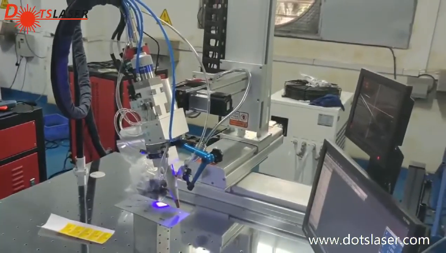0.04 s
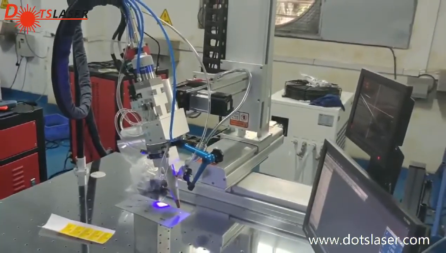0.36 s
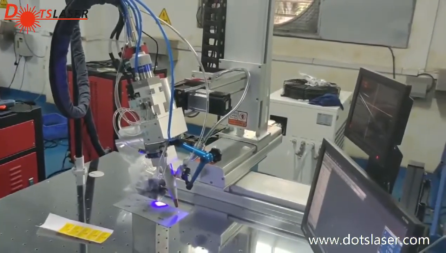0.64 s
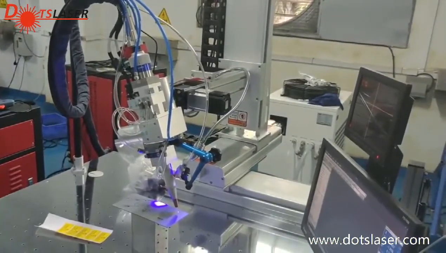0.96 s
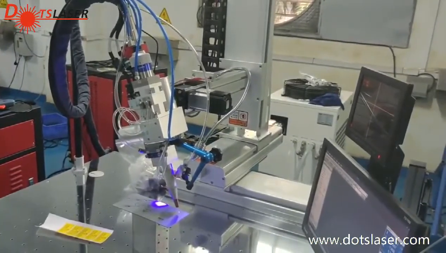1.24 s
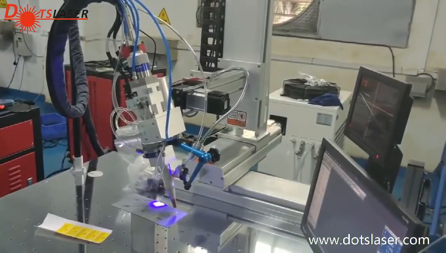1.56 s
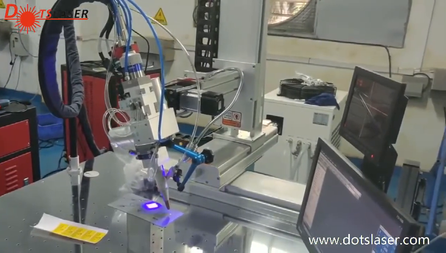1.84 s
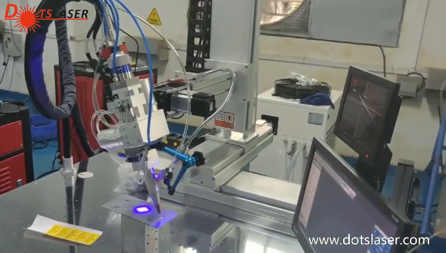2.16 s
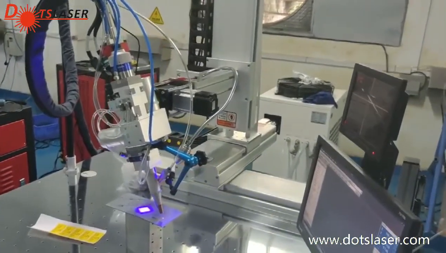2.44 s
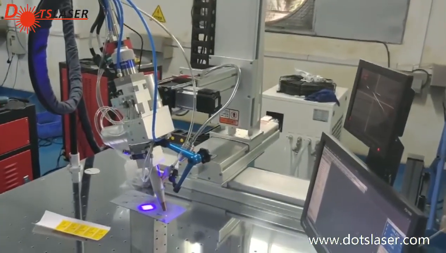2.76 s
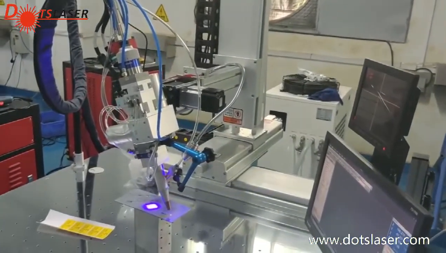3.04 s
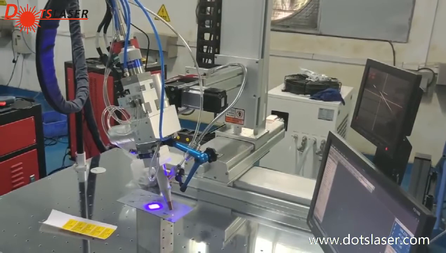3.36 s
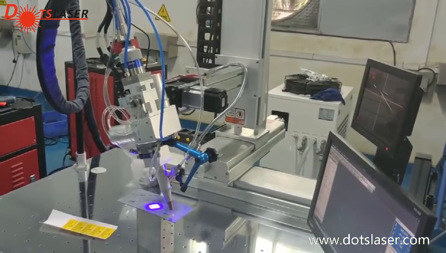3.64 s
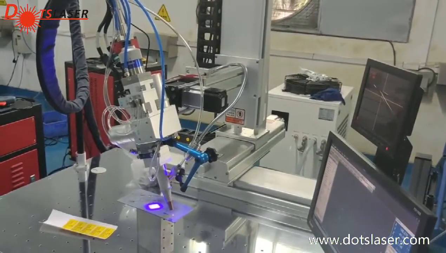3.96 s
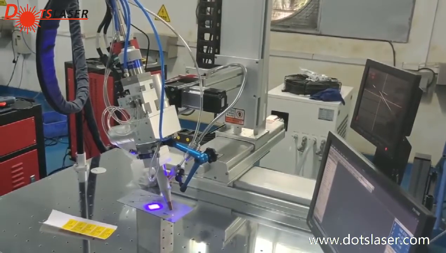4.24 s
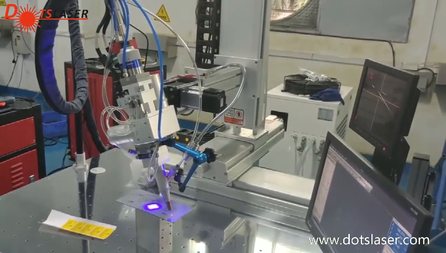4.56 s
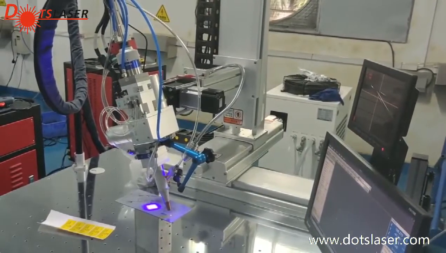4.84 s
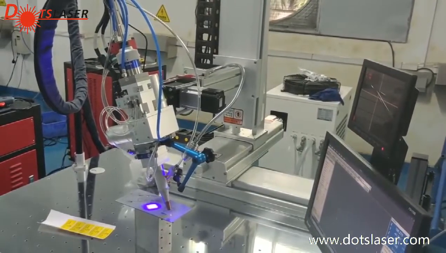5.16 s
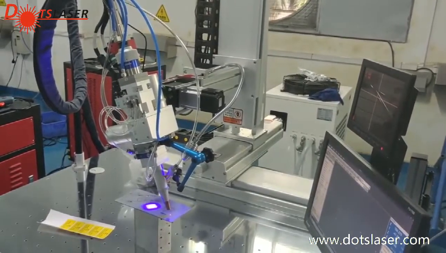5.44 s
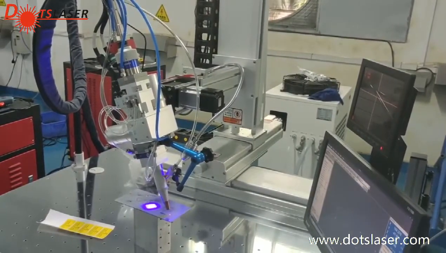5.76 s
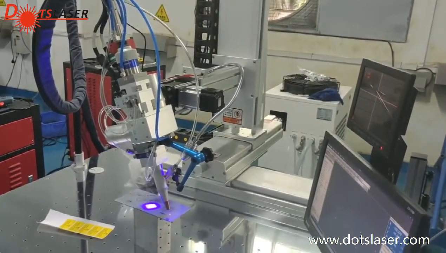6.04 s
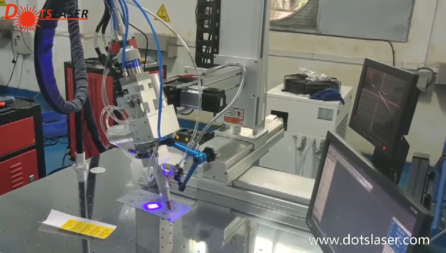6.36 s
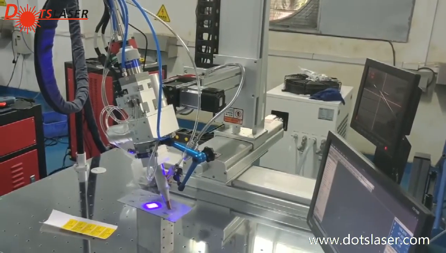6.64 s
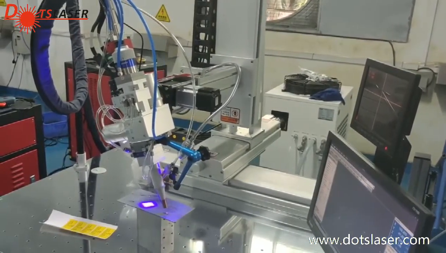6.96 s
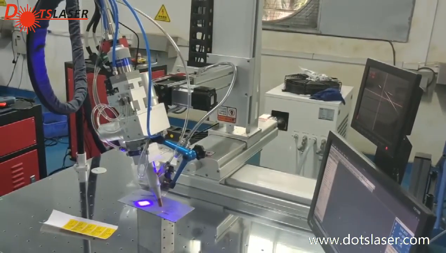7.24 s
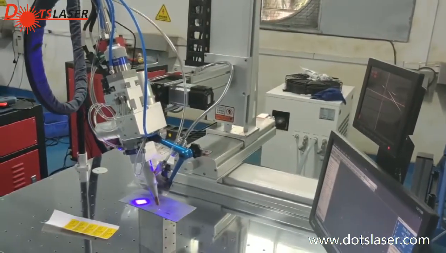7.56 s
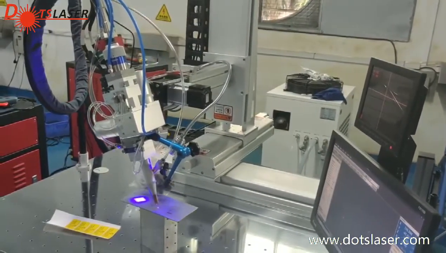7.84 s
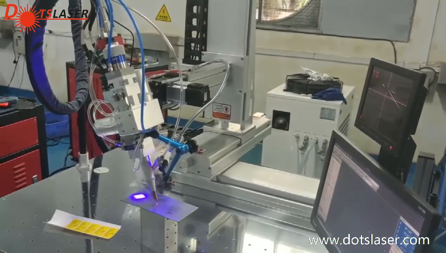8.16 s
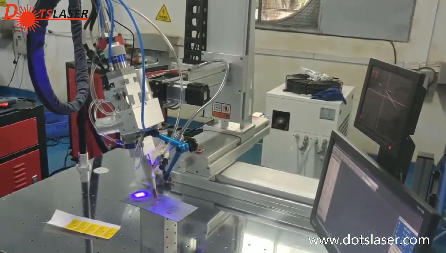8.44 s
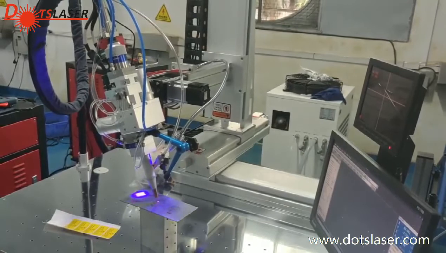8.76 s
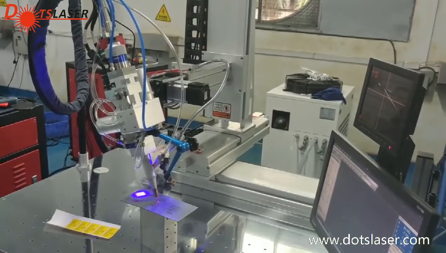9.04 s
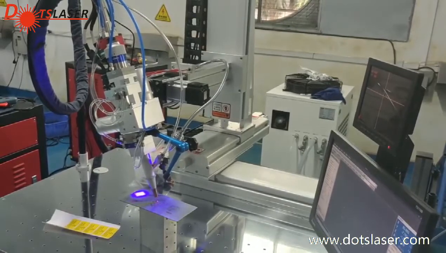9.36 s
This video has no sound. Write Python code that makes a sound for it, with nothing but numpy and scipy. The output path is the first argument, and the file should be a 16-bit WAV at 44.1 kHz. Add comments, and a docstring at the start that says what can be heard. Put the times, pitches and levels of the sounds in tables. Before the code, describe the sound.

A laser welder hisses loudly, surging and twice cutting out, over faint workshop machine hum and a few low puffs on the microphone.

```python
"""A laser welding head runs along a steel seam, over shielding gas and the hum of workshop machines.
The vapour plume hisses from the start, as puffs of air hit the right microphone port.
At 1.6 s it nearly dies; it relights at 2.1 s and surges, while gas rings in nozzle and keyhole.
More puffs land near 5.8 s. The plume fades again at 8.1 s, flares once more and stops at 9.1 s,
and a motor's drone swells at the end."""
import sys
import numpy as np
from scipy import signal
from scipy.fft import rfft, irfft
from scipy.io import wavfile

SR = 44100
rng = np.random.default_rng(int(sys.argv[2]) if len(sys.argv) > 2 else 0)


def wav_record(signal):
    """Record a signal, one row per channel, as 16-bit PCM in the file named by sys.argv[1]."""
    frames = np.transpose(np.atleast_2d(signal))
    bounded = np.clip(frames, -1, 1)
    # unit amplitude maps onto the largest positive 16-bit level
    quanta = np.round(bounded * 32767).astype(np.int16)
    wavfile.write(sys.argv[1], SR, quanta)


N = 423360
TIME = np.arange(N) / SR
BINS_HZ = np.maximum(np.arange(N // 2 + 1) * SR / N, 1)

# the plume's base colour: (frequency [Hz], relative level [dB])
PLUME_SPECTRUM = [(900, -22.5), (1500, -14), (1950, -7.5), (2200, -2), (2700, 2.5), (3900, 1.5), (4500, 3),
                  (5600, 9.5), (7000, 6.5), (8000, 1.5), (10600, 1.34), (13000, 5.5), (14600, 9.5),
                  (15500, 8)]
# its slow level and tone ride: (time [s], relative hiss level [dB], body [dB], sizzle [dB])
PLUME_RIDE = [(0, -26.6, -2, 6.5), (.72, -27, -4.5, 8), (1.1, -25, -6, 8), (1.6, -24.5, -7.5, 7.5),
              (2.15, -25.5, -4.5, 10.5), (2.45, -26.5, -9, 8), (3.2, -28, -7, 11), (3.7, -29, -5.5, 10),
              (4.9, -29, -4, 10), (5.35, -27.5, -2, 9.5), (5.72, -24.3, -6.5, 8), (6.25, -24.9, -6.3, 7.3),
              (6.55, -27.5, -7, 8.5), (7.57, -27, -7.5, 8.7), (7.65, -29.5, -7, 9), (8.1, -31, -3.5, 7.5),
              (8.4, -34, -3.5, 1), (8.75, -33.5, -.5, 3), (9.15, -28.5, -6, 5)]
# EQ bells for body, rush and sizzle: (centre [Hz], half width [Hz], flat setting [dB])
PLUME_BELLS = [(2660, 2800, -5), (5620, 990, 3.5), (14360, 3070, 5)]
# the jet swells to a fuller rush: (middle [s], length [s], strength [dB])
SURGES = [(.33, .86, 7.5), (.88, 0.23, 3.5), (1.33, 0.47, 1), (3.68, 0.14, 6.5), (3.86, .11, 8),
          (4.16, 0.19, 10.5), (4.43, 0.2, 3.5), (4.63, 0.13, 7.5), (5.16, .52, 3.5), (5.84, .26, 5.3),
          (6.44, .08, 0.5), (6.68, 0.14, 4), (7.54, .1, 4.5), (7.86, .34, 2)]
# the jet falters: (middle [s], length [s], dip [dB])
SAGS = [(.96, 0.12, 2.5), (3.02, .1, 1), (3.36, .14, 4), (3.52, 0.13, 3.5), (5.47, 0.081, 2.5),
        (5.595, .17, 8), (6.56, 0.12, 2), (6.85, .12, 0.5), (7.2, .14, 0.3)]
# stereo image of the hiss: (frequency [Hz], left over right [dB])
HISS_PAN = [(2000, -0.5), (3000, -2.5), (4200, 0.5), (5500, -2.5), (7500, 0), (9500, 1.3), (10700, -0.5),
            (11500, 3.5), (12700, 0), (15000, -1)]
# only the shortest waves are beamed to one side: (time [s], added left over right [dB])
SIZZLE_PAN = [(.5, -6), (1.2, -8.5), (2.2, -8), (3.4, -5.5), (7.56, -5.5), (7.68, 2), (8.0, 2), (8.25, -3),
              (9.2, -1)]
def plume(level_db=12.0, flutter_db=0.68, calm_rush_db=1.7, wide_share=0.4):
    """Metal vapour jets from the melt: surges lift its mid rush, sags dim it, its colour drifts."""
    hz, t, frames = signal.stft(coloured(PLUME_SPECTRUM), SR, nperseg=256)
    hz = np.maximum(hz, 1)[:, None]
    hiss_db, body_db, sizzle_db = automation(PLUME_RIDE, t)
    body_db = body_db + 0.96 * np.interp(t, TIME, drift(6.6))
    # a surge is shared between a wide band and the narrow rush bell
    surge_db = gated_db(SURGES, t)
    wide_db = wide_share * surge_db * bell(hz, centre_hz=6600, width_hz=6000)
    rush_db = calm_rush_db + (1 - wide_share) * surge_db
    gain_db = level_db + hiss_db - gated_db(SAGS, t) + wide_db
    for (centre, width, flat_db), band_db in zip(PLUME_BELLS, (body_db, rush_db, sizzle_db)):
        gain_db = gain_db + bell(hz, centre, width) * (band_db - flat_db)
    beam_db = bell(hz, centre_hz=14550, width_hz=1800) * automation(SIZZLE_PAN, t)[0]
    left_db = at_hz(HISS_PAN, hz) + beam_db
    frames = frames * burning(hz, t) * from_db([gain_db + left_db / 2, gain_db - left_db / 2])
    return signal.istft(frames, SR)[1][:, :N] * from_db(flutter_db * drift(23))


# three burns, timed at reference_hz: (start [s], stop [s], attack [s], release [dB/s], rush trim [dB])
BURNS = [(-.5, 1.595, .05, 167, -0.5), (2.098, 8.09, 0.067, 58, 0), (8.675, 9.13, 0.027, 132, -4)]
def burning(hz, t=TIME, reference_hz=9050):
    """The plume's envelope at a frequency: it lights, holds and dies away, the treble first."""
    pitch_ratio = np.maximum(hz, 1000) / reference_hz
    rush_band = bell(hz, centre_hz=5870, width_hz=1300)
    envelope = 0
    for start, stop, attack, release, rush_db in BURNS:
        lit = 1 - np.exp(-np.maximum(t - start, 0) / attack * pitch_ratio ** 0.74)
        faded_db = release * pitch_ratio ** .33 * np.maximum(t - stop, 0)
        envelope = envelope + lit * from_db(rush_db * rush_band - faded_db)
    return envelope


# cues for the keyhole's breathy ring: (middle [s], length [s], relative level [dB])
KEYHOLE_RINGS = [(2.33, 0.21, -28), (2.55, 0.23, -29.5), (2.73, 0.15, -24.5), (2.9, 0.19, -30.5),
                 (3.144, 0.27, -29), (3.48, 0.36, -34.5), (3.977, .12, -33), (4.338, .1, -34),
                 (4.884, 0.19, -31.5), (5.117, .2, -31.5), (5.34, .2, -29), (6.28, 0.11, -35),
                 (6.95, 0.26, -34.5), (7.357, .1, -34)]
# its resonances: (centre [Hz], half width [Hz], relative level [dB])
KEYHOLE_MODES = [(2790, 270, -6.5), (3510, 310, 0.5)]
def gas_resonances(nozzle_hz=4770, overtone_hz=11960, surge_share=.55):
    """The stream rings at the nozzle and in the weld's keyhole; a thin overtone follows the sizzle."""
    hiss_db, _, sizzle_db = automation(PLUME_RIDE)
    hiss_db = hiss_db - gated_db(SAGS)
    gas_db = automation(GAS_FLOW)[0]
    rings = sum(from_db(db) * gate(middle, length) for middle, length, db in KEYHOLE_RINGS)
    # gas, plume and keyhole all blow on the nozzle
    jet = burning(nozzle_hz) * from_db(hiss_db + surge_share * gated_db(SURGES))
    breath = np.sqrt(from_db(gas_db + 3) ** 2 + jet ** 2 + (rings * from_db(-1)) ** 2)
    sizzle = burning(overtone_hz) * from_db(hiss_db + 0.84 * sizzle_db - 9.5)
    overtone_gain = np.hypot(from_db(gas_db - 20.5), sizzle)
    # the pitches stray as the flow changes
    nozzle = wander(ringing(nozzle_hz, width_hz=345), depth=.017) * breath * from_db(1.3 * drift(12))
    modes = sum(from_db(db) * ringing(hz, width) for hz, width, db in KEYHOLE_MODES)
    keyhole = wander(modes, depth=.012) * rings * from_db(.8 * drift(10))
    overtone = ringing(overtone_hz, width_hz=200) * overtone_gain * from_db(drift(6.5))
    return nozzle * pan(left_db=-3) + keyhole * pan(left_db=-1.5) + overtone * pan(left_db=-8)


# the gas bed's fader: (time [s], level [dB])
GAS_FLOW = [(0, -40), (2.05, -40), (8.6, -49), (9.6, -43.5)]
# its colour: (frequency [Hz], relative level [dB])
GAS_SPECTRUM = [(900, -18), (2000, -4), (2700, 1.5), (3500, 5), (3900, -2), (5600, 4), (7000, 2),
                (8000, -1), (10600, -2), (14600, -2), (15500, -7)]
def shielding_gas():
    """Gas flows throughout with a soft hiss, bare whenever the plume is out."""
    return coloured(GAS_SPECTRUM) * from_db(automation(GAS_FLOW)[0])


# early reflections off table, head and gantry: (delay [ms], level against the direct sound [dB])
ECHOES = [(1.3, -14), (2.1, -17), (2.9, -13.5), (4.099, -16), (5.6, -11), (7.5, -13.5)]
def steel_reflections(x, sway_ms=0.0947):
    """Nearby metal combs the hiss; the combs slide as the head and the hand-held microphone move."""
    hz, t, frames = signal.stft(x, SR, nperseg=2048, noverlap=1536)
    response, power = 1, 1
    for ms, db in ECHOES:
        delay_ms = ms + sway_ms * np.interp(t, TIME, drift(.25))
        response = response + from_db(db) * np.exp(-2j * np.pi * hz[:, None] * delay_ms / 1000)
        power = power + from_db(db) ** 2
    return signal.istft(frames * response / np.sqrt(power), SR, noverlap=1536)[1][:, :N]


# wind thumps: (time [s], pressure peak [dB], swing [Hz], turbulence [dB], its rise and fall [s])
PUFFS = [(.178, -16.5, 130, -26, 0.031), (.200, -22, 100, -44, 0.009), (.307, -28, 120, -39, .02),
         (.359, -24, 130, -33, .015), (.39, -23, 120, -29, .015), (.435, -20.5, 120, -31, .02),
         (.522, -29, 120, -35, 0.044), (.762, -30, 100, -38, 0.033), (1.3656, -13.5, 125, -27, 0.0098),
         (5.7765, -15, 120, -34.5, .03), (5.8, -18, 130, -42, .015), (5.820, -21, 110, -33, .02),
         (5.8876, -12.5, 104, -23.5, 0.013)]
# the dull colour of their turbulence: (frequency [Hz], relative level [dB])
BUFFET_SPECTRUM = [(20, -8), (70, 2.5), (160, -10), (300, -7), (600, -9), (1200, -17.5), (3000, -31)]
def draught(left_leak_db=-19, steady_db=-55.5):
    """Each eddy pushes then pulls on the right port, amid lumpy turbulence."""
    turbulence = coloured(BUFFET_SPECTRUM)[1] * from_db(2 * drift(40))
    pressure = turbulence * from_db(steady_db)
    for s, db, hz, stir_db, stir_s in PUFFS:
        phase = 2 * np.pi * hz * (TIME - s)
        push_pull = -phase * np.exp((1 - np.minimum(phase ** 2, 200)) / 2)
        pressure += from_db(db) * push_pull + turbulence * from_db(stir_db) * swell(s, stir_s, stir_s)
    return pressure * np.array([[from_db(left_leak_db)], [1]])


# the low hum comes forward: (middle [s], length [s], boost [dB])
HUM_SWELLS = [(4.7, 0.83, 6.5), (6.95, .5, 3.5), (8.35, .7, 8.5), (9.2, 1.0, 5)]
# gantry drive cues: (middle [s], length [s], level [dB])
DRIVE_RUNS = [(2.9, 1.84, -50.5), (4.8, 1.83, -47.5)]
# the drone swells and sinks: (peak time [s], rise [s], fall [s], level [dB])
DRONE_SWELLS = [(8.0, .13, .3, -44), (9.15, .2, 0.11, -43), (9.43, .13, 0.13, -29)]
def motors(hum_db=-56.5, drone_hz=221.0):
    """A low motor hum, the rough whirr of the gantry drive and a drone that swells late."""
    hum = from_db(hum_db + gated_db(HUM_SWELLS) + 1.9 * drift(3)) * tone(hz=87.8, wobble=1.93)
    drive_gain = sum(from_db(db) * gate(middle, length) for middle, length, db in DRIVE_RUNS)
    whirr = drive_gain * ringing(hz=416, width_hz=18)
    drone_gain = sum(from_db(db) * swell(s, rise, fall) for s, rise, fall, db in DRONE_SWELLS)
    return hum + whirr + drone_gain * tone(drone_hz, wobble=.25)


# the fans' faders: (time [s], relative rumble level [dB], relative air level [dB])
FAN_RIDE = [(0, -54, -43), (1.0, -49, -48), (1.6, -47.5, -50), (2.15, -43.5, -45), (2.8, -46.3, -48.5),
            (3.7, -44.5, -44), (5.6, -48, -45.5), (6.4, -49.5, -47), (8.1, -46, -46.5), (9.1, -40.5, -42)]
# colours of the rumble and of the rushing air: (frequency [Hz], relative level [dB])
RUMBLE_SPECTRUM = [(20, -16), (45, -10.5), (90, -0.5), (140, -1), (200, -1), (300, -3), (500, -7),
                   (1000, -39)]
AIR_SPECTRUM = [(100, -13.5), (250, -2.5), (420, -2.5), (600, -2.5), (800, -2), (1200, -9.5), (1800, -14),
                (2600, -5), (5000, -28), (12000, -35)]
# machine notes in the room tone: (pitch [Hz], relative level [dB])
MACHINE_TONES = [(172.3, -56), (301.0, -53.5), (500, -60.5), (620, -63.5), (813, -61)]
def workshop():
    """Fans rumble and blow; machine tones waver in the room and rise with the rumble."""
    rumble_db, air_db = automation(FAN_RIDE)
    rumble = coloured(RUMBLE_SPECTRUM) * from_db(rumble_db + 1.5)
    air = coloured(AIR_SPECTRUM) * from_db(air_db + 4) * pan(left_db=-0.7)
    tones = sum(from_db(db - 1 + 2 * drift(1.5)) * tone(hz, wobble=1.73) for hz, db in MACHINE_TONES)
    return rumble + air + tones * from_db(rumble_db - np.median(rumble_db))


# stereo width at two close ports: (frequency [Hz], left-right correlation [-1 to 1])
PORT_CORRELATION = [(60, 0.99), (220, 0.88), (380, 0.57), (520, -0.027), (800, -0.21), (1500, -0.47),
                    (2000, 0.048), (2800, 0.36), (3500, 0.48), (4100, 0.64), (4700, 0.2), (5500, 0.035),
                    (7500, -0.21), (12000, 0.16), (15000, -0.019)]
def noise(gain):
    """Stereo turbulence of rms 1, shaped by a gain per frequency."""
    alike = np.clip(at_hz(PORT_CORRELATION, BINS_HZ), -.99, .99)
    mid, side = rfft(rng.standard_normal((2, N)))
    left_right = np.sqrt(1 + alike) * mid + np.sqrt(1 - alike) * side * np.array([[1], [-1]])
    return unit_rms(irfft(left_right * gain, N))


def coloured(spectrum):
    """Turbulence with a broad spectrum."""
    return noise(from_db(at_hz(spectrum, BINS_HZ)))


def ringing(hz, width_hz):
    """Turbulence caught in a resonance with steep skirts."""
    return noise(1 / (1 + ((BINS_HZ - hz) / width_hz) ** 2))


def tone(hz, wobble):
    """A sine of rms 1 whose phase wanders by wobble radians."""
    return np.sqrt(2) * np.sin(2 * np.pi * hz * TIME + wobble * drift(2.7))


def drift(rate_hz):
    """Smooth random modulation of rms 1."""
    return unit_rms(irfft(rfft(rng.standard_normal(N)) / (1 + (BINS_HZ / rate_hz) ** 2), N))


def wander(x, depth):
    """Varispeed: the pitch strays by the fraction depth."""
    warped = TIME + np.cumsum(depth * drift(rate_hz=2)) / SR
    return np.array([np.interp(warped % TIME[-1], TIME, channel) for channel in x])


def gate(middle, length, t=TIME, edge_s=0.027):
    """Opens towards 1 while an event lasts, with soft edges."""
    return .5 + .5 * np.tanh((length / 2 - np.abs(t - middle)) / edge_s)


def gated_db(rows, t=TIME):
    """The summed dB of a table of passing events."""
    return sum(db * gate(middle, length, t) for middle, length, db in rows)


def swell(peak_s, rise_s, fall_s):
    """Exponential rise to 1 and exponential fall."""
    return np.exp(-np.minimum(np.maximum((peak_s - TIME) / rise_s, (TIME - peak_s) / fall_s), 20))


def bell(hz, centre_hz, width_hz):
    """A broad EQ bell, 1 at its centre."""
    return np.exp(-np.abs((hz - centre_hz) / width_hz) ** 3)


def automation(rows, t=TIME):
    """Each lane of a breakpoint table at the times t."""
    times, *lanes = np.transpose(rows)
    return [np.interp(t, times, lane) for lane in lanes]


def at_hz(points, hz):
    """Read a curve on a log-frequency axis."""
    known_hz, values = np.transpose(points)
    return np.interp(np.log(hz), np.log(known_hz), values)


def pan(left_db):
    """Left and right gains for a level difference."""
    return from_db(np.array([[.5], [-.5]]) * left_db)


def from_db(db):
    """Decibels to gain."""
    return 10 ** (np.asarray(db) / 20)


def unit_rms(x):
    """Scale to unit power."""
    return x / np.sqrt(np.mean(x ** 2) + 1e-20)


def scene():
    """The weld and its reflections, mixed with room tone, motors and draught."""
    weld = plume() + shielding_gas() + gas_resonances()
    return steel_reflections(weld) + workshop() + motors() + draught()


def record(dry, ceiling=.88, cutoff_hz=15480):
    """A soft clip rounds only the highest peaks; a steep low-pass cuts the top."""
    rounded = dry / (1 + (dry / ceiling) ** 8) ** (1 / 8)
    return irfft(rfft(rounded) / np.sqrt(1 + (BINS_HZ / cutoff_hz) ** 1000), N)


dry = scene()
out = record(dry)
wav_record(out)
```